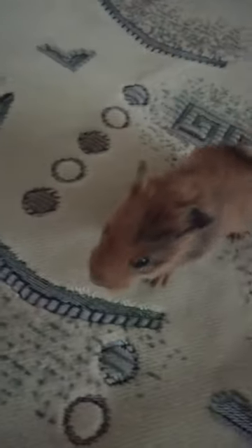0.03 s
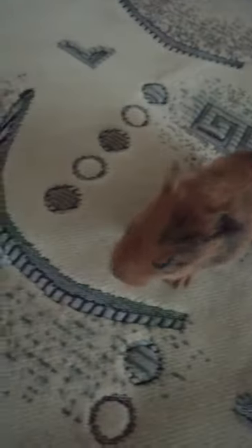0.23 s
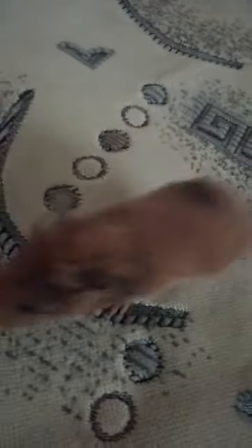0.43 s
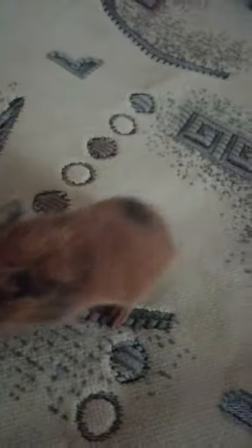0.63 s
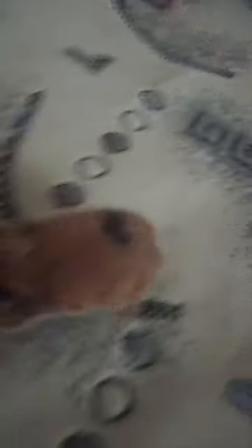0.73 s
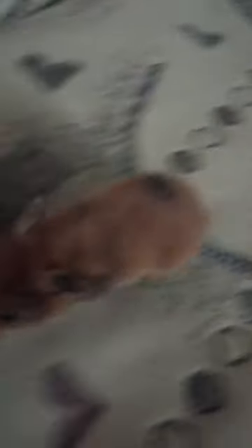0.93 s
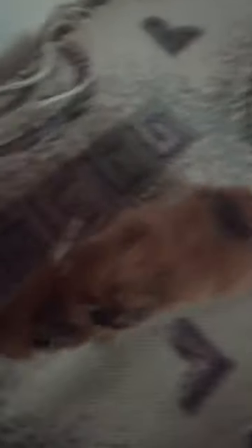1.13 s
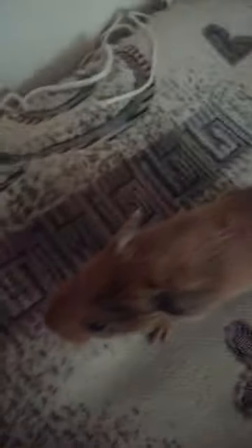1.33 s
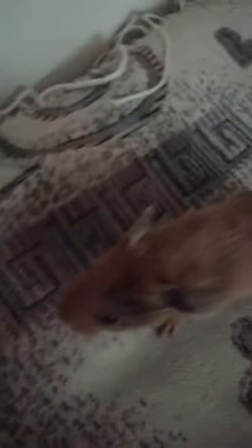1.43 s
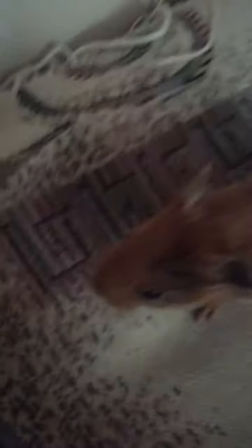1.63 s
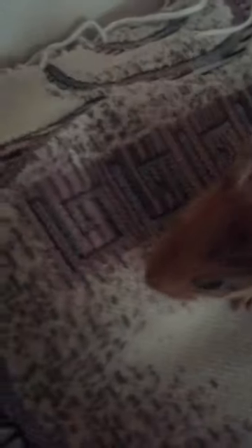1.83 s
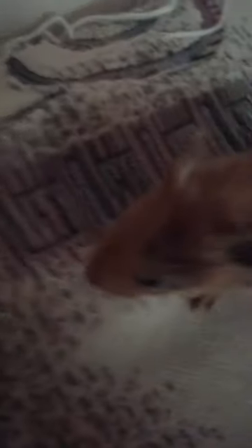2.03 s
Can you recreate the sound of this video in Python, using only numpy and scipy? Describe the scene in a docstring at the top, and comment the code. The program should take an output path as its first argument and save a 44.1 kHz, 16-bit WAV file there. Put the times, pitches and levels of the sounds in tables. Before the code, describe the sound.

A guinea pig gives four quick squeals that sweep up into high whistles, the first a shriek. Three soft whimpers follow, with dull thuds on the close microphone and faint rug rustles in a small room.

```python
"""A guinea pig wheeks four times: each call is a low whine that sweeps up into a whistle, and the first
breaks into a shriek. Three soft whimpers follow. Its voice is one gliding tone with overtones, echoing
in a small room. A hand-held camera close by is bumped as it follows the animal, giving dull thuds.
Underneath are faint rustles on the rug, a quiet hiss and the rumble of the hand on the camera."""
import sys
import numpy as np
from scipy import signal
from scipy.fft import rfft, irfft, next_fast_len
from scipy.io import wavfile
from scipy.ndimage import uniform_filter1d, map_coordinates

SR = 44100
rng = np.random.default_rng(int(sys.argv[2]) if len(sys.argv) > 2 else 0)


def generate_wav(signal):
    """Clip the signal to [-1, 1] and save it as 16-bit WAV at the path in sys.argv[1]."""
    frames = np.transpose(np.atleast_2d(signal))
    scaled = np.clip(frames, -1, 1) * 32767
    pcm = np.round(scaled).astype(np.int16)
    wavfile.write(sys.argv[1], SR, pcm)


N = 92610

# The path of each cry. Harmonic k is a tone at k times the pitch; the first is the pitch itself.
# Columns: time_s, pitch_hz, level_db, second_harmonic_over_first_db
WHEEK_1 = [(0.111, 977, -62, -19.5), (0.122, 1084, -43.7, -25.5), (0.15, 1006, -42.5, -9.5),
           (0.177, 1133, -40.1, -10), (0.181, 924, -44, -5), (0.197, 978, -40.5, -4), (0.21, 1235, -38, -8),
           (0.222, 1576, -44, -5), (0.231, 2290, -33.5, -21), (0.24, 3090, -36.5, -22),
           (0.255, 3910, -30.5, -43), (0.263, 4270, -37, -21.5), (0.266, 4123, -25, -29),
           (0.282, 4470, -22.5, -23), (0.298, 4825, -21.5, -40), (0.302, 5254, -27.5, -30),
           (0.311, 5111, -29, -32), (0.317, 4802, -45.5, -42)]
WHEEK_2 = [(.401, 999, -44, -15.5), (.409, 1042, -39, -10), (.412, 865.5, -41, -3), (.43, 846, -38.5, -1.5),
           (.45, 802, -41, -1.5), (.486, 859.5, -42.5, -0.5), (.498, 1014, -44, -0.5), (.511, 1254, -40, 0),
           (.52, 1941, -40, -16), (.531, 2802, -33.5, -22), (.541, 3725, -39.5, -28),
           (.55, 4430, -48.5, -15), (.559, 4815, -43.5, -31), (.566, 4930, -33.5, -38),
           (.573, 4820, -41.5, -34)]
WHEEK_3 = [(0.654, 1003, -46.5, -6.5), (0.666, 1005, -41, -9.5), (.669, 835, -40.5, -1.5),
           (.705, 769, -41.5, -2), (0.731, 811.7, -41, -0.5), (0.747, 770, -43, 1.5), (.758, 870, -45, 4),
           (.767, 1070, -43.5, 1), (.778, 1698, -38.5, -16), (.792, 2954, -35, -26.5),
           (0.802, 4000, -51, -9.5), (.809, 4620, -42.5, -27), (.816, 4790, -37.5, -37),
           (0.825, 4640, -49, -38)]
WHEEK_4 = [(0.911, 984, -42, -7), (.917, 985, -45, -6), (.92, 913.4, -41, -0.5), (.935, 902.4, -42, -3),
           (.948, 860, -39.5, -4.5), (.952, 777, -41.5, -2), (0.976, 757.2, -43, -3.5),
           (.99, 798, -42.5, 0.5), (1.002, 864.6, -41, 3), (1.024, 903, -44.5, 5.5),
           (1.036, 1146, -44.5, 1), (1.042, 1904, -32, -33), (1.051, 2530, -41, -21),
           (1.061, 3920, -43.5, -4), (1.065, 4340, -49.5, -3), (1.073, 4405, -47, -21)]
WHIMPER_1 = [(1.563, 806, -52, -15), (1.574, 857, -45, -16), (1.6, 868.5, -43, -12.5),
             (1.626, 863, -42.5, -10.5), (1.646, 972, -45, -9.5), (1.662, 1032, -45, -9),
             (1.69, 1036, -47.5, -4.5), (1.7, 1122, -48.5, -15), (1.713, 1000, -56, -24)]
WHIMPER_2 = [(1.793, 855, -52, -14), (1.803, 1056, -50.5, -14), (1.814, 1086, -49.5, -20.5),
             (1.846, 901.6, -44, -15.5), (1.862, 770, -46, -31)]
WHIMPER_3 = [(2.037, 886, -48, -18.5), (2.047, 862, -46, -11.5), (2.074, 900.4, -44, -14),
             (2.096, 887, -44.5, -5)]
# How strong the third harmonic is at each pitch. Columns: pitch_hz, third_over_second_db
THIRD_HARMONIC = [(770, -8), (870, -17.5), (980, -24), (1200, -17.5), (2200, -21), (3500, -20), (4400, -11),
                  (4900, -1)]
# The shriek's strained third harmonic and its harsh noise. Columns: time_s, level_db
SHRIEK_HARMONIC = [(.257, -69), (.264, -33), (.272, -24.5), (.283, -37.5), (.298, -34), (.304, -75),
                   (.317, -63.5)]
SHRIEK_NOISE = [(.225, -86.5), (.24, -68), (.261, -67), (.2645, -47), (.269, -61), (.281, -53), (.3, -57),
                (.315, -63), (.325, -92.5)]
# Brief rasps in the upward sweeps. Columns: middle_s, width_s, level_db
RASPS = [(.227, 0.0017, -66.5), (.238, 0.0034, -66), (0.529, .004, -66), (0.559, 0.0098, -64.5),
         (.789, 0.0074, -69), (.812, 0.0077, -65.5), (1.046, 0.0054, -69)]
# Where the voice sits between the two microphones. Columns: frequency_hz, left_minus_right_db
WHEEK_PAN = [(780, -2), (880, -5), (1050, 4), (1300, -3.5), (1650, 1), (2100, -9.5), (2700, -8),
             (3700, -10), (4150, 3), (4450, -23), (4800, -2.5), (5200, 54), (6500, -1), (9000, -13),
             (12500, -12.5), (15000, -2)]
WHIMPER_PAN = [(850, 1), (1050, 8.5), (1750, -8), (2100, -14), (3000, -4)]
# How far the wave at the left microphone runs ahead. Columns: frequency_hz, lead_radians
LEFT_LEAD = [(800, 0.88), (2000, 0.22), (3800, 1.53), (4400, 1.5), (4900, 0.91), (7700, 1.5), (12700, -2.6),
             (14500, -2.5)]
# How long the echo lasts (a fade time is the time to drop 60 dB). Columns: frequency_hz, fade_s
ECHO_FADE = [(200, .35), (1000, 0.29), (2200, 0.27), (4400, 0.33), (5200, 0.29), (9000, .3), (13000, 0.21)]
# How much of the voice comes back as echo. Columns: frequency_hz, gain_db
ECHO_GAIN = [(700, -17.5), (1200, -20), (2200, -18.5), (3400, -18), (4300, -18), (5100, -19.5),
             (9000, -20.5), (12700, -23.5), (15000, -19.5)]
# Bumps on the camera body. Columns: start_s, thud_db, knock_db, knock_pitch_hz
BUMPS = [(1.115, -46.5, -52, 408), (1.139, -35, -53, 267), (1.194, -41.5, -60.5, 391),
         (1.231, -49, -70, 374), (1.361, -53.5, -69.5, 236), (1.864, -40, -53, 193.8),
         (1.895, -43, -66, 135)]
# Soft rubbing on the rug. Columns: middle_s, width_s, hiss_db, scuff_db
RUSTLES = [(1.03, .03, -70, -80.5), (1.14, 0.038, -64.5, -66.5), (1.39, 0.018, -98, -81.5),
           (1.47, 0.052, -75.5, -74.5), (1.564, 0.014, -77.5, -71), (1.84, 0.046, -79, -74.5),
           (2.001, 0.067, -71, -83)]
# Rumble of the hand holding the camera. Columns: time_s, level_db
HAND_RUMBLE = [(0, -79.5), (.3, -74.5), (.39, -68.5), (.46, -75), (.56, -74.5), (.85, -75), (1.03, -68),
               (1.3, -70), (1.44, -70.5), (1.5, -85.5), (1.58, -71), (1.72, -77.5), (1.95, -63.5),
               (2.1, -70.5)]
# The colour of each noise, meaning its mix of low and high. Columns: frequency_hz, relative_db
SHRIEK_COLOUR = [(500, -39.5), (1200, -12), (3000, -2), (4500, -0.5), (6000, -5), (9000, -8), (11000, -24),
                 (13000, -4.5), (15500, -8)]
RASP_COLOUR = [(700, -35), (2500, -6.5), (5000, 0.5), (7500, -3.5), (10000, -14), (15000, -19.5)]
KNOCK_COLOUR = [(30, 2), (90, 1.5), (150, -5), (280, -5.5), (410, -10.5), (560, -32), (1200, -42),
                (4000, -55)]
RUG_HISS_COLOUR = [(1000, 7), (3000, -1), (7500, 0.5), (10000, -8), (15000, -14.5)]
RUG_SCUFF_COLOUR = [(30, -13), (90, -10.5), (160, -1.5), (230, 3.5), (400, -11.5), (1000, -29), (4000, -50)]
ROOM_RING_COLOUR = [(500, -39.5), (950, -1.5), (1300, 1), (1900, -2.5), (2600, -10.5), (5000, -30.5)]
STEADY_HISS_COLOUR = [(100, 4), (300, -1), (550, -6.5), (1000, -2.5), (1500, -2), (2600, -8), (4000, -7.5),
                      (15500, -11)]
RUMBLE_COLOUR = [(20, -3.5), (45, 3.5), (80, 2), (120, -7.5), (200, -8.5), (350, -26.5), (700, -68),
                 (3000, -60)]

ROUGH_PAN_DB = -5  # shriek noise and rasps sit a little to the right
BODY_ALIKE = .93  # knocks and scuffs reach both microphones through the camera body


def guinea_pig():
    """Four wheeks, the first with a harsh peak, then three whimpers from a new spot."""
    wheeks = cry(WHEEK_1, strain=SHRIEK_HARMONIC) + sum(map(cry, (WHEEK_2, WHEEK_3, WHEEK_4)))
    whimpers = sum(cry(path, fourth_db=-8.5, step_db=-3.5) for path in (WHIMPER_1, WHIMPER_2, WHIMPER_3))
    # In the last wheek the animal turns away: less direct sound, the same echo.
    turn_s, turn_length_s = 1.052, .016
    turn_db = -14.5 * np.clip((clock() - turn_s) / turn_length_s, 0, 1)
    return (shriek() + at_microphones(wheeks, WHEEK_PAN, direct_db=turn_db)
            + at_microphones(whimpers, WHIMPER_PAN, echo_db=-3))


def cry(path, fourth_db=-15, step_db=-16.5, strain=None):
    """One cry: a gliding, slightly shaky tone made of up to six harmonics."""
    attack_s, release_s, voice_db = .0025, .0055, .5
    pitch_shake, level_shake_db, roughness_db = .0015, .43, -40.5
    t = clock()
    pitch_hz, first_db, second_over_first_db = curves(path)
    second_db = first_db + second_over_first_db
    third_db = second_db + look_up(THIRD_HARMONIC, pitch_hz)
    # The fourth harmonic is set against the third; each higher one is a step weaker.
    upper_db = [third_db + fourth_db + step_db * k for k in range(3)]
    if strain is not None:
        strain_db, = curves(strain)
        third_db = np.where(during(strain), strain_db, third_db)
    phase = 2 * np.pi * np.cumsum(pitch_hz * (1 + pitch_shake * wobble(350))) / SR
    voice = np.zeros(N)
    for k, level_db in enumerate([first_db, second_db, third_db] + upper_db, 1):
        tone = np.sin(k * phase) + amp(roughness_db) * k * wobble(3200) * np.cos(k * phase)
        in_range = k * pitch_hz < SR / 2  # skip tones too high for the sample rate
        voice += amp(level_db + level_shake_db * k * wobble(160)) * tone * in_range
    fade_in = np.clip((t - path[0][0]) / attack_s + .5, 0, 1)
    fade_out = np.clip((path[-1][0] - t) / release_s + 1, 0, 1)
    return amp(voice_db) * fade_in * fade_out * voice


def shriek():
    """Harsh noise where the first wheek breaks."""
    level_db, = curves(SHRIEK_NOISE)
    return amp(level_db) * during(SHRIEK_NOISE) * noise(SHRIEK_COLOUR, alike=.5) * panned(ROUGH_PAN_DB)


def rasps():
    """The voice catches for a moment as it climbs, making tiny puffs of noise."""
    level = sum(amp(level_db) * swell(middle_s, width_s) for middle_s, width_s, level_db in RASPS)
    return level * noise(RASP_COLOUR, alike=.5) * panned(ROUGH_PAN_DB)


def at_microphones(voice, pan, direct_db=0, echo_db=0):
    """The voice reaches each microphone with its own level and timing, and the room adds an echo."""
    def response(hz):
        timing = np.exp(.5j * look_up(LEFT_LEAD, hz) * np.array([[1], [-1]]))
        return panned(look_up(pan, hz)) * timing
    return filtered(voice * amp(direct_db), response) + amp(echo_db) * room_echo(voice)


def room_echo(voice):
    """Quick bounces off nearby furniture, and a tail in which each frequency fades at its own speed."""
    build_up_s, bounce_decay_s, bounce_db = .004, .007, -13.5
    hz, t, spectrum = signal.stft(rng.standard_normal((2, SR // 2)), SR, nperseg=256)
    fade = np.exp(-np.log(1000) * t / look_up(ECHO_FADE, hz)[:, None])
    _, tail = signal.istft(spectrum * fade, SR, nperseg=256)
    age = np.arange(tail.shape[1]) / SR
    tail *= 1 - np.exp(-age / build_up_s)
    bounces = rng.standard_normal(tail.shape) * age * np.exp(-age / bounce_decay_s)

    def echo(pattern):
        return signal.fftconvolve(voice[None], pattern / np.linalg.norm(pattern[0]), axes=1)[:, :N]

    def gain(hz):
        return amp(look_up(ECHO_GAIN, hz))

    early = filtered(echo(bounces), lambda hz: gain(hz) / gain(hz).max())
    return amp(bounce_db) * early + filtered(echo(tail), gain)


def camera_bumps():
    """Each bump on the camera makes a low thud, a short ring and a dull, noisy knock."""
    thud_hz = 65.5
    out = np.zeros((2, N))
    for start_s, thud_db, knock_db, knock_hz in BUMPS:
        phase_per_hz = 2 * np.pi * (clock() - start_s)
        thud = struck(start_s, fade_s=.1, rise_s=.0023) * np.sin(thud_hz * phase_per_hz)
        ring = struck(start_s, fade_s=.092, rise_s=.00046) * np.sin(knock_hz * phase_per_hz)
        knock = struck(start_s, fade_s=.21, rise_s=.00069) * noise(KNOCK_COLOUR, BODY_ALIKE)
        out += amp(thud_db) * thud + amp(knock_db) * (amp(-1) * ring + knock)
    return out


def rug_rustles():
    """Short swells of rubbing on the rug: a fine hiss on the right over a low scuff."""
    hiss_level = sum(amp(hiss_db) * swell(middle_s, width_s) for middle_s, width_s, hiss_db, _ in RUSTLES)
    scuff_level = sum(amp(db) * swell(middle_s, width_s) for middle_s, width_s, _, db in RUSTLES)
    flutter = amp(wobble(140))  # about 1 dB up and down
    hiss = hiss_level * flutter * panned(-19) * noise(RUG_HISS_COLOUR, alike=.07)
    return hiss + scuff_level * noise(RUG_SCUFF_COLOUR, BODY_ALIKE)


def background():
    """The room's ring dying away at the start, a steady hiss and the rumble of the hand."""
    ring = amp(-69) * struck(0, fade_s=.4, rise_s=.00067) * noise(ROOM_RING_COLOUR, alike=.3)
    hiss = amp(-73) * noise(STEADY_HISS_COLOUR, alike=.3)
    rumble_db, = curves(HAND_RUMBLE)
    return ring + hiss + amp(rumble_db) * noise(RUMBLE_COLOUR, alike=.99)


def amp(db):
    """Turn decibels into a number to multiply by."""
    return 10 ** (np.asarray(db) / 20)


def clock():
    """The time of each sample, in seconds."""
    return np.arange(N) / SR


def during(rows):
    """True between a table's first and last times."""
    return (clock() > rows[0][0]) & (clock() < rows[-1][0])


def look_up(table, hz):
    """Read between the rows of a frequency table, with octaves evenly spaced."""
    frequencies, values = np.transpose(table)
    return np.interp(np.log(hz + 1), np.log(frequencies + 1), values)


def curves(rows):
    """Join the rows of a time table into one smooth curve for each column after the time."""
    times, *columns = np.transpose(rows)
    return [uniform_filter1d(np.interp(clock(), np.sort(times), column), size=64) for column in columns]


def wobble(per_second):
    """A smooth random curve through this many random points a second."""
    return map_coordinates(rng.standard_normal(N // 8), [clock() * per_second + 2], mode="wrap")


def swell(middle_s, width_s):
    """A bell-shaped rise and fall."""
    return np.exp(-.5 * ((clock() - middle_s) / width_s) ** 2)


def struck(start_s, fade_s, rise_s):
    """A quick rise, then a drop of 60 dB every fade_s."""
    age = np.maximum(clock() - start_s, 0)
    return np.exp(-np.log(1000) * age / fade_s) * (1 - np.exp(-age / rise_s))


def filtered(sound, response):
    """Multiply each frequency in the sound by response(hz)."""
    size = next_fast_len(N + SR // 2)
    return irfft(rfft(sound, size) * response(np.fft.rfftfreq(size, 1 / SR)), size)[..., :N]


def panned(left_minus_right_db):
    """Left and right gains that move a sound sideways and keep its total power."""
    gains = amp(np.array([[1], [-1]]) * left_minus_right_db / 2)
    return gains / np.sqrt(np.mean(gains ** 2, axis=0))


def noise(colour, alike):
    """Stereo noise of average power 1; alike runs from 0 (unrelated sides) to 1 (identical sides)."""
    shared, side = filtered(rng.standard_normal((2, N)), lambda hz: amp(look_up(colour, hz)))
    spread = np.arccos(alike) / 2
    stereo = np.cos(spread) * shared + np.sin(spread) * np.array([side, -side])
    return stereo / np.sqrt(np.mean(stereo ** 2) + 1e-20)


def scene():
    """All the sounds together."""
    return guinea_pig() + camera_bumps() + rug_rustles() + background() + rasps()


def record(dry):
    """The camera cuts off the very highest treble."""
    top_hz = 15780
    return filtered(dry, lambda hz: hz < top_hz)


dry = scene()
out = record(dry)
generate_wav(out)
```